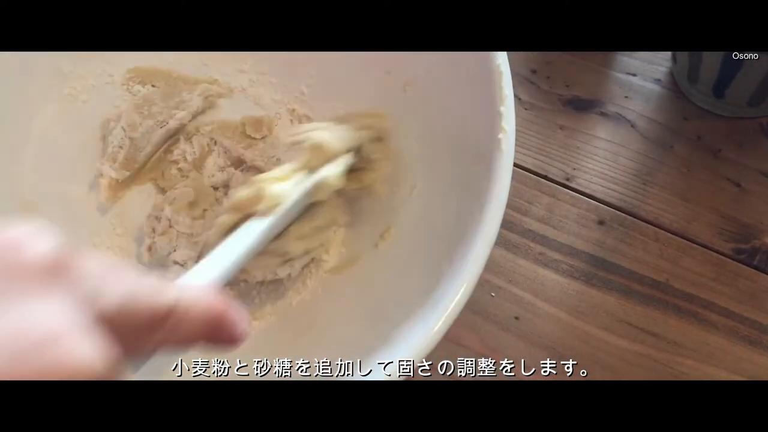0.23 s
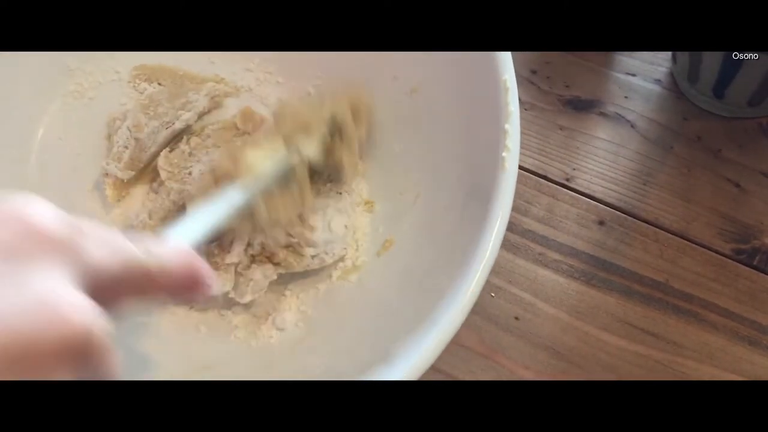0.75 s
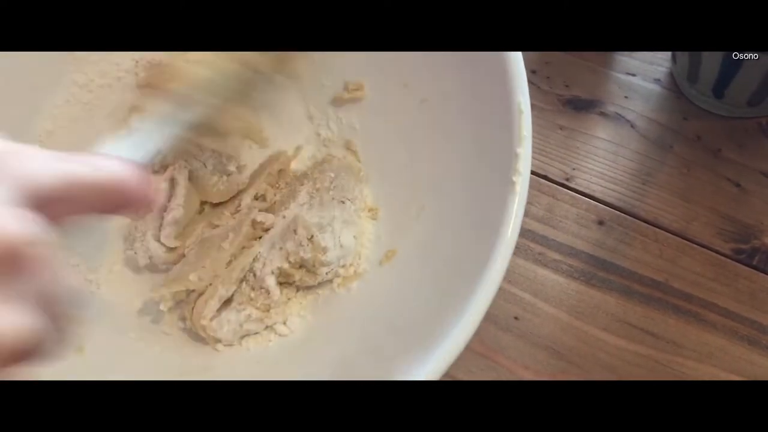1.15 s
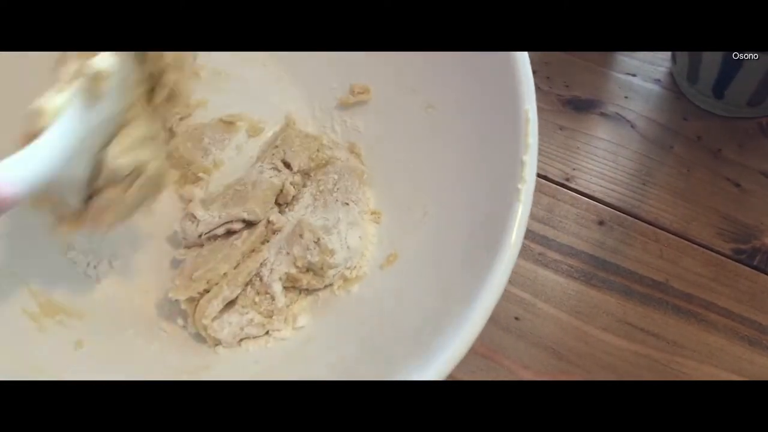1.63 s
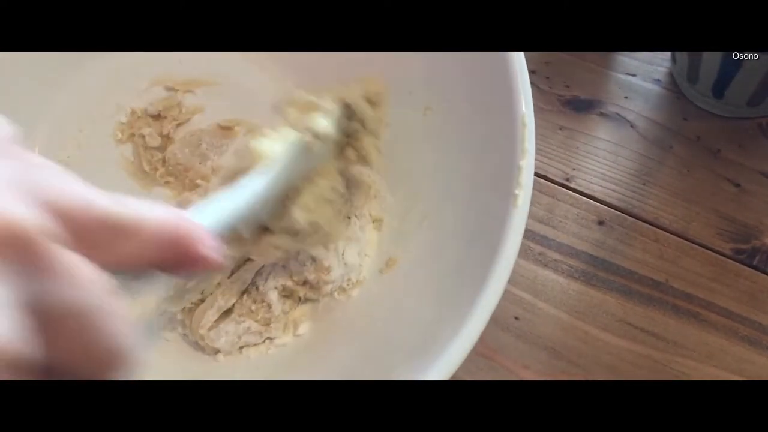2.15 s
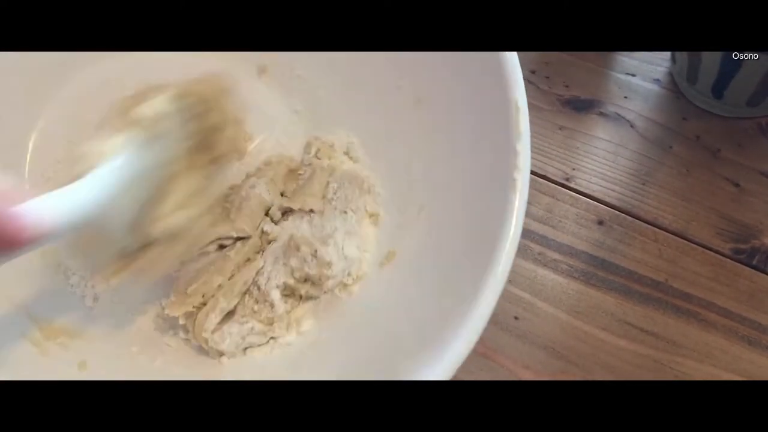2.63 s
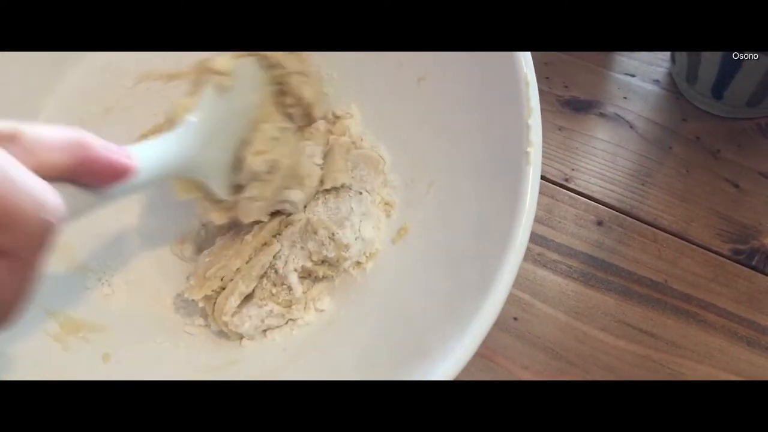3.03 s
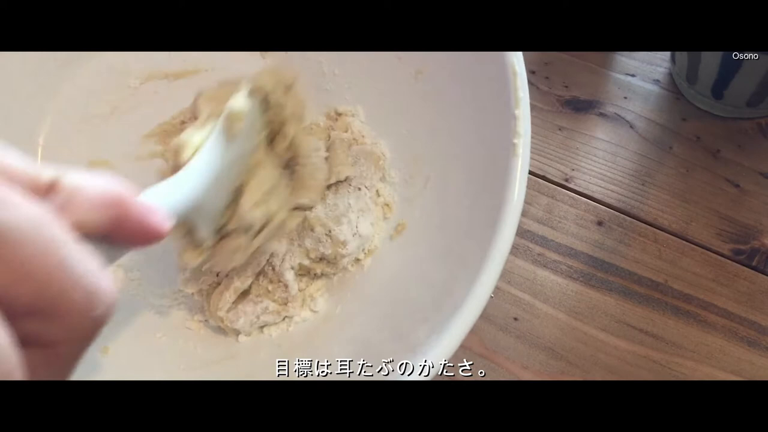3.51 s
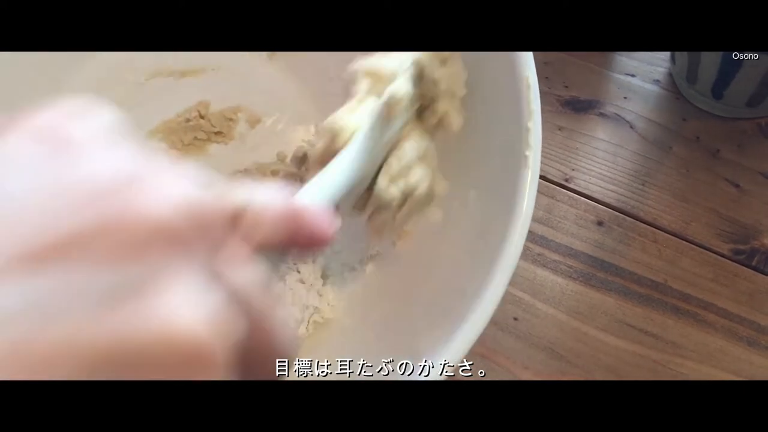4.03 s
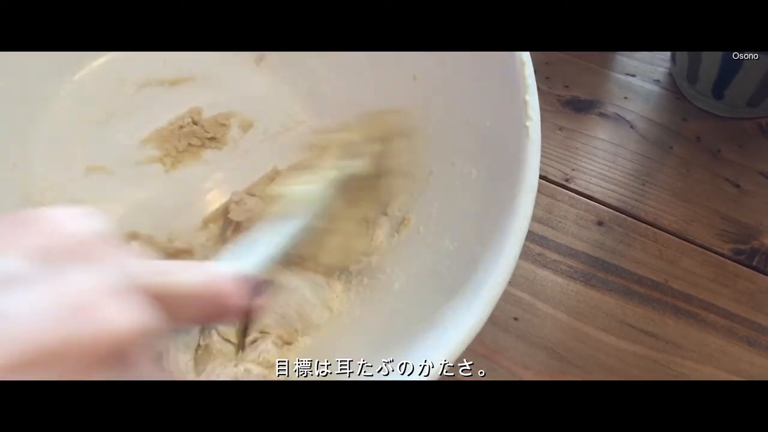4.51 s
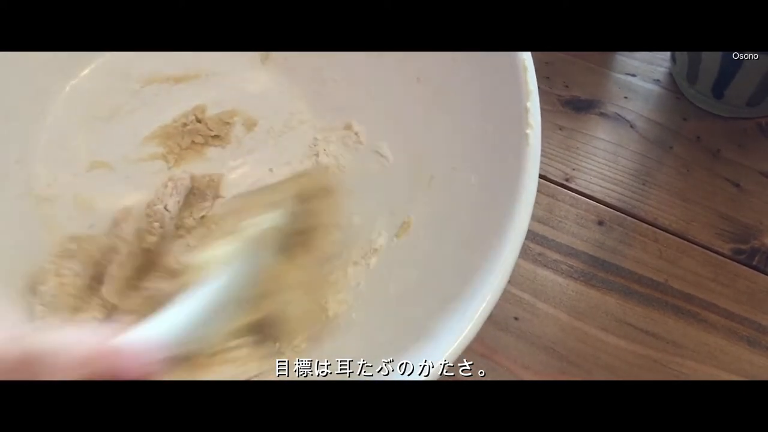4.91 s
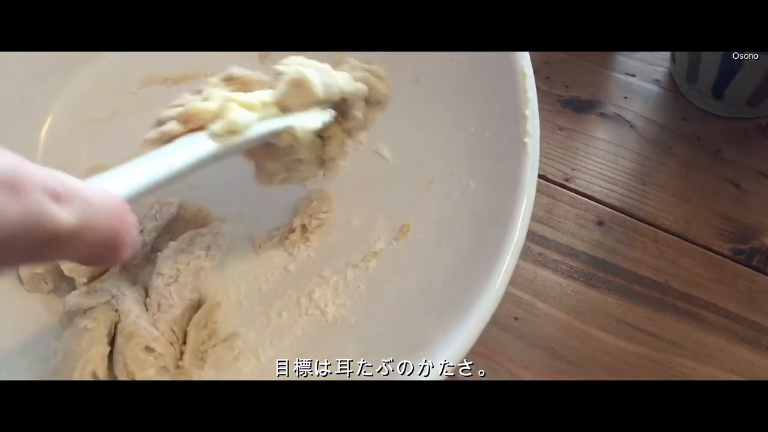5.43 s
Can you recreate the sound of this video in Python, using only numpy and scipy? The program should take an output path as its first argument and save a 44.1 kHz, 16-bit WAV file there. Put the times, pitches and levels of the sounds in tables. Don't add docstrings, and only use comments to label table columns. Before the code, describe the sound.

A spatula scrapes stiff, floury dough in a glazed bowl, with short gritty strokes, sticky snaps and dull knocks over a wooden table.

```python
import sys
import numpy as np
from scipy import signal
from scipy.fft import rfft, irfft, next_fast_len
from scipy.io import wavfile
from scipy.ndimage import uniform_filter1d, map_coordinates

SR = 44100
rng = np.random.default_rng(int(sys.argv[2]) if len(sys.argv) > 2 else 0)


def linear_from_db(decibels):
    return 10 ** (np.asarray(decibels, float) / 20)


def master(y):
    cut = np.clip(np.atleast_2d(y).T, -1, 1)
    pcm = np.round(cut * 32767)
    wavfile.write(sys.argv[1], SR, pcm.astype(np.int16))


N = 249606

# f/Hz, level/dB
ROOM_SPECTRUM = [(30, -18.5), (50, -1.5), (75, -3.5), (161, -9), (473, -20.5), (548, -22), (754, -22),
                 (2330, -25), (4190, -28.5), (4970, -24), (5490, -26.5), (8740, -33), (10400, -33),
                 (14600, -37), (15700, -54)]
# t/s, peak level/dB, f/Hz, rebound interval/s, loss per rebound/dB
ROCKS = [(0.017, -32.5, 81.2, 0.046, 4.5), (.138, -41.5, 64.6, 0.028, 6), (1.264, -40.5, 76.4, 0.022, 5),
         (1.553, -42.5, 67, 0.043, 6), (1.801, -51.5, 80.5, 0.031, 4), (1.965, -46.5, 66, 0.037, 1),
         (2.084, -41.5, 68, 0.03, 12), (2.265, -49.5, 75.5, .06, 9), (2.405, -31.5, 83, 0.043, 4.5),
         (2.593, -36.5, 65.6, 0.033, 15), (2.657, -53.5, 66, 0.039, 0), (2.848, -35, 100, 0.025, 7),
         (2.944, -47, 82, .036, 3.5), (3.337, -37.5, 65.5, 0.029, 8), (3.438, -35.5, 75, 0.025, 11),
         (3.509, -45, 64.7, 0.034, 22), (4.206, -36, 86.5, 0.054, 8.5), (4.703, -35, 79, 0.036, 5.5),
         (4.983, -46, 71.4, 0.048, 6.5)]
# t/s, peak level/dB, f/Hz, swell width/cycles
NUDGES = [(.829, -43.5, 77, 0.62), (.885, -56, 67, 0.83), (.951, -62, 88, 2.1), (1.091, -54.5, 57, 0.77),
          (1.131, -51.5, 77, 0.65), (1.187, -39, 77.4, 0.64), (1.21, -38, 80, 0.69),
          (1.362, -53.4, 66, .45), (1.442, -42, 90, 0.62), (1.518, -43, 66, 0.99), (1.724, -57, 69, 0.36),
          (1.904, -38, 66.3, 0.48), (2.224, -47, 53.4, 0.76), (2.566, -46.5, 74, 0.46),
          (2.753, -54, 73, 0.47), (2.807, -41, 61.4, 0.44), (3.302, -66, 112, .6),
          (3.403, -39.5, 72.6, 1.3), (3.598, -68, 77, .45), (3.719, -37.5, 62, 0.48),
          (3.779, -51, 74.8, 3.6), (3.824, -38.5, 76, 0.62), (4.545, -43, 71, 0.76), (4.603, -23, 91, 0.53),
          (4.643, -36.5, 98, 2.5), (4.906, -36.5, 80, 0.49), (4.944, -52, 93.6, 4.1),
          (5.238, -45, 80, 0.36), (5.319, -64, 92, 3.2), (5.49, -51, 85, 0.73)]
# start t/s, length/s, level/dB, initial f/Hz, final f/Hz
SLIDES = [(2.41, .08, -60, 455, 500), (2.49, .1, -60, 500, 600), (2.405, .06, -63, 700, 620),
          (2.39, 0.12, -65, 1040, 970), (2.55, .04, -65, 1150, 1100), (2.48, 0.084, -63, 1900, 1880),
          (2.868, .014, -51, 1800, 1790), (2.885, .045, -63, 1800, 1780), (2.94, 0.027, -61, 1900, 1850),
          (2.855, .025, -60, 1250, 1100), (2.838, .01, -52, 1250, 1250), (3.455, .025, -62, 2050, 2050),
          (3.48, .06, -66, 2000, 2000), (1.575, 0.033, -66, 1900, 1980), (1.543, .012, -62, 1030, 1030),
          (2.111, .012, -44, 1200, 1140), (4.935, 0.038, -66, 3280, 3500), (3.328, .04, -61, 1050, 1050),
          (1.855, .025, -63, 500, 480), (2.96, 0.096, -64, 520, 600), (.62, 0.048, -68, 8100, 8100),
          (3.325, 0.013, -60.5, 7700, 7800), (3.326, 0.013, -59, 2950, 2950), (3.505, .035, -54, 520, 680),
          (3.52, .03, -63, 1100, 1050), (4.58, .025, -68, 1300, 1300), (4.51, .07, -62, 470, 480),
          (4.6, .14, -47, 155, 150), (4.59, .1, -60, 260, 240), (1.17, .11, -66, 200, 180),
          (.96, .03, -66, 3500, 3550), (1.02, .045, -69, 4350, 4350), (1.02, .03, -67, 2550, 2550),
          (1.19, .04, -68, 2650, 2600), (1.21, .04, -68, 2000, 1950), (1.17, .09, -66, 600, 550),
          (5.01, .05, -64, 3300, 3600)]
# t/s, peak level/dB, f/Hz
SNAPS = [(0.0164, -69, 1350), (0.8589, -54, 2140), (1.856, -48, 1270), (1.8724, -56, 3100),
         (1.8843, -47, 1270), (1.8957, -47.5, 1180), (2.075, -49, 1660), (2.0865, -48, 1400),
         (2.097, -46, 1500), (2.11, -39, 3000), (2.1107, -30, 1800), (2.1121, -43, 1180),
         (2.4354, -54, 1900), (3.122, -54, 900), (3.3323, -71, 2060), (3.5665, -45, 2480),
         (3.5668, -53, 1500), (3.5662, -53, 3400), (4.5137, -51, 2950), (4.8905, -57, 1380),
         (4.913, -52, 1500), (5.22, -52.5, 1260), (5.2217, -45, 2300)]
# t/s, clack level/dB, wall ring level/dB, ring f/Hz, thud level/dB
KNOCKS = [(0.0114, -63, -86, 457, -43), (0.0616, -69, -83, 428, -47), (1.168, -67, -54.5, 513, -54),
          (1.5437, -54.5, -57, 452, -47), (1.79, -59.5, -64, 587, -49), (1.8555, -61, -53, 497, -68),
          (1.8715, -55, -55, 519, -66), (1.883, -53, -51.5, 522, -69), (1.895, -57, -52, 500, -70),
          (1.9428, -62, -73, 590, -46), (2.3826, -37, -44, 520, -45), (2.3838, -32, -27, 475, -25),
          (2.445, -33, -50, 496, -41), (2.547, -62, -51, 543, -60), (2.576, -58, -51, 507, -42.5),
          (2.8394, -50, -36, 427, -29), (2.8565, -43, -40, 487, -38), (2.8614, -41, -38, 483, -36),
          (2.867, -45, -44, 453, -39), (3.3145, -45, -37.5, 509, -34.5), (3.3295, -46.5, -51, 580, -58),
          (3.5236, -63, -54, 594, -76), (3.5379, -73, -37.5, 506, -81), (4.1736, -86, -57, 450, -48),
          (4.3305, -87, -56.5, 515, -73), (4.584, -59, -53, 483, -37.5), (4.632, -82, -80, 467, -50),
          (4.8899, -58, -55, 453, -55), (4.9119, -68, -57, 432, -67)]
# f/Hz, width/Hz
HOLLOWS = [(345, 30), (1480, 160)]
# f/Hz, width/Hz, level/dB
BLADE_MODES = [(1792, 39, -1.5), (1943, 100, 9.5), (2242, 144, 3.5), (2565, 130, -1.5), (2895, 80, -6),
               (3065, 110, -3.5), (3500, 260, -3.5), (4170, 200, -4.5)]
# f/Hz, width/Hz, level/dB
WALL_MODES = [(458, 12, -11), (529, 97, 8), (614, 41, -2), (1049, 75, -6), (1226, 42, -13)]
# f/Hz, width/Hz, level/dB
RIM_MODES = [(1038, 45, 2.5), (1215, 75, -1)]
# f/Hz, width/Hz, level/dB
TABLE_MODES = [(155, 44, 21), (202.4, 6.1, -3), (250, 17, 0), (287, 59, -25.5), (363, 19, -52)]
# f/Hz, width/Hz, level/dB
GLAZE_MODES = [(6540, 75, 4), (7035, 70, 4), (7320, 810, 14), (7940, 120, 1), (8550, 140, -10),
               (9800, 35, -25), (10940, 54, -4), (11300, 260, -17), (12000, 59, -40), (11850, 190, -7),
               (11800, 100, -21), (11900, 52, -20), (14500, 170, -8), (13800, 210, -40)]
# peak t/s, rise/s, grind level/dB, share of the thin edge/dB
PRESSES = [(.15, 0.17, -75.5, 0), (.55, 0.38, -74, -1.5), (.87, 0.16, -67.5, -1.5), (0.976, 0.059, -62, -1),
           (1.044, 0.078, -63, -3.5), (1.21, 0.089, -66.5, -3.5), (1.34, 0.07, -67, -1),
           (1.49, 0.054, -69, 1), (1.58, 0.085, -68.5, -11), (1.882, 0.06, -58, -5.5),
           (1.92, 0.056, -64, -1.5), (2.08, 0.042, -55, -3), (2.11, 0.066, -55.5, -4.5),
           (2.4, 0.039, -60, -31), (2.451, 0.02, -46, -9), (2.53, .12, -61.5, -5.5),
           (2.64, 0.056, -68.5, -4), (2.873, 0.026, -53, -12), (2.94, .12, -62.5, -28),
           (3.03, 0.1, -69.5, 0), (3.332, 0.03, -60, -4), (3.49, 0.16, -69.5, -10), (3.56, 0.058, -78, 1),
           (3.88, 0.2, -68.5, -2), (4.285, 0.11, -64.5, -1.5), (4.56, 0.078, -69, 2),
           (4.701, 0.084, -61, -1), (4.95, 0.038, -64.5, -2), (5.005, .055, -57, 0),
           (5.045, 0.06, -55, 0.5), (5.222, 0.016, -58.5, -10), (5.3, 0.16, -79, -3)]
# peak t/s, rise/s, wall hum level/dB, table drag level/dB
LEANS = [(0.0, 0.57, -94, -64), (.55, 1, -80.5, -72), (.98, 0.61, -79, -75.5), (1.27, 0.31, -69, -64.5),
         (1.55, 0.23, -72.5, -68), (1.95, 0.82, -79, -68.5), (2.43, 0.08, -57.5, -55),
         (2.52, 0.16, -63, -58.5), (2.65, 0.19, -91, -67.5), (2.93, 0.19, -64.5, -62.5),
         (3.03, 0.31, -67, -86), (3.34, 0.068, -63, -59), (3.48, 0.68, -73.5, -65), (4.26, 0.37, -76, -69),
         (4.545, 0.053, -65.5, -72), (4.63, 0.2, -74, -59), (4.72, 0.15, -76, -61),
         (4.96, 0.13, -68, -61.5), (5.07, 0.085, -87, -66), (5.45, 1, -85, -74)]
# f/Hz, level/dB
PASTE_SPECTRUM = [(410, -5), (700, 2.5), (930, -17), (1140, 3.5), (2710, -19.5), (4920, -13), (5500, -9.5),
                  (7150, -44), (12100, -120)]
# peak t/s, rise/s, hiss level/dB, airy part relative to hiss/dB
SWEEPS = [(0.0, 0.049, -73.5, -8), (.17, 0.058, -73.5, -7), (.56, 0.07, -74, -5), (0.644, 0.031, -64, -4),
          (.84, 0.1, -72.5, -6), (.97, .045, -63, -8), (1.048, 0.049, -65.5, -10), (1.24, 0.14, -78, 2),
          (1.331, 0.047, -67, -0.5), (1.501, 0.064, -75, -2), (1.851, 0.028, -59, -13),
          (1.911, 0.044, -51, -14.5), (1.979, 0.05, -62, -9), (2.096, 0.067, -53, -7),
          (2.5, 0.074, -68, -7), (2.598, 0.064, -63.5, -19), (2.89, 0.086, -71, -7),
          (3.02, 0.088, -72.5, -6), (3.17, 0.035, -75, -14), (3.504, 0.05, -65, 0.5),
          (3.811, 0.053, -66, 3.5), (3.865, 0.066, -60, -5), (3.955, 0.052, -62.5, -2.5),
          (4.176, 0.037, -60, -7), (4.304, 0.063, -62, -3.5), (4.561, 0.051, -68.5, -4),
          (4.716, 0.073, -59, -6), (5.021, 0.092, -51.5, -3.5), (5.22, 0.067, -70, -3),
          (5.31, .11, -77, -2)]
# t/s, peak level/dB, decay time t60/s
SCUFFS = [
    (1.1707, -36.5, 0.1),
    (1.57, -38, 0.1),
    (1.7896, -33, 0.047),
    (2.441, -33, 0.048),
    (2.8654, -36, 0.031),
    (3.326, -41, 0.052),
    (3.3836, -35.5, 0.074),
    (4.148, -40, 0.18),
    (4.5131, -47, 0.18),
]
# f/Hz, level/dB
FLOUR_SPECTRUM = [(2650, -9), (4500, -3), (5000, -16), (5940, -18), (6330, -22.5), (8710, 4), (10600, -0.5),
                  (11500, -0.5), (15700, 0)]
# f/Hz, width/Hz, depth/dB
PORT_DIPS = [(5030, 590, -4.5), (10450, 300, -3)]


def unit(x):
    return x / np.sqrt(np.mean(x ** 2) + 1e-20)


def wobble(rate):
    s = np.arange(0, N / SR + .002, .001)
    knots = rng.standard_normal(int(N * rate / SR) + 4)
    return np.interp(np.arange(N) / SR, s, map_coordinates(knots, [s * rate]))


def filtered(x, response):
    m = next_fast_len(N + 8192)
    return irfft(rfft(x, m) * response(np.fft.rfftfreq(m, 1 / SR)), m)[:N]


def highpassed(x, corner_hz):
    return filtered(x, lambda hz: 1 / (1 + (corner_hz / (hz + 1)) ** 8))


def coloured(x, spectrum):
    f, level = np.transpose(spectrum)
    return unit(filtered(x, lambda hz: linear_from_db(np.interp(np.log(hz + 1), np.log(f), level, -120, -120))))


def grit(spread_db, clump_db):
    size = linear_from_db(spread_db * rng.standard_normal(N) + clump_db * wobble(70))
    return unit(size * rng.standard_normal(N))


def rubbed(force, modes):
    out = np.zeros(N)
    for hz, width, db in modes:
        ring = signal.lfilter(*signal.iirpeak(hz, hz / width, SR), force)
        out += linear_from_db(db + 2.4 * wobble(22)) * unit(ring)
    return unit(out)


def struck(modes, damping, attack):
    t = np.arange(SR // 5) / SR
    hz, width, db = np.transpose(modes)[:, :, None]
    strength = linear_from_db(db + 1.5 * rng.standard_normal(hz.shape))
    decay = np.exp(-np.pi * damping * width * t)
    ring = np.sum(strength * decay * np.sin(2 * np.pi * hz * t), axis=0)
    ring = ring * (1 - np.exp(-t / attack)) ** 1.36
    return ring / np.abs(ring).max()


def packets(rows):
    out = np.zeros(N)
    for s, db, hz, cycles in rows:
        at = np.arange(max(round((s - 5 / hz) * SR), 0), min(round((s + 5 / hz) * SR), N))
        turns = (at / SR - s) * hz
        out[at] -= linear_from_db(db) * np.exp(-.5 * (turns / cycles) ** 2) * np.cos(2 * np.pi * turns)
    return out


def strokes(rows, hold):
    peak, rise = np.transpose(rows)[:2, :, None]
    s = np.arange(0, N / SR + .002, .001)
    fall_over_rise, drop_db, curve = 1.05, 24, 1.75
    away = np.where(s < peak, peak - s, (s - peak) / fall_over_rise) / rise
    shape = linear_from_db(-np.minimum(drop_db * np.maximum(away - hold, 0) ** curve, 200))
    return lambda gains: np.interp(np.arange(N) / SR, s, np.sqrt(gains ** 2 @ shape ** 2))


def patchy(x, patchy_db):
    z = signal.stft(x, nperseg=512)[2]
    field = uniform_filter1d(rng.standard_normal(z.shape), size=3, axis=0)
    field = uniform_filter1d(field, size=9, axis=1)
    return unit(signal.istft(z * linear_from_db(patchy_db * unit(field)), nperseg=512)[1][:N])


def kitchen():
    return linear_from_db(-67.5 + 0.087 * wobble(16.0)) * coloured(rng.standard_normal(N), ROOM_SPECTRUM)


def thumps():
    fill = 0.26
    rebounds = [(s + k * gap, db - k * loss_db, hz, fill * gap * hz)
                for s, db, hz, gap, loss_db in ROCKS for k in range(4)]
    return packets(NUDGES + rebounds)


def slides():
    out = np.zeros(N + SR)
    unsteadiness, steady = .12, .4
    for s, length, db, from_hz, to_hz in SLIDES:
        u = np.linspace(0, 1, round(length * SR) + 2)
        turns = np.cumsum(from_hz + (to_hz - from_hz) * u) / SR
        a, b = [map_coordinates(k, [unsteadiness * turns]) for k in rng.standard_normal((2, 200))]
        tone = (a + steady) * np.cos(2 * np.pi * turns) + b * np.sin(2 * np.pi * turns)
        out[round(s * SR):][:len(u)] += linear_from_db(db) * np.sin(np.pi * u) ** 0.5 * tone
    return out[:N]


def snaps():
    return packets([(s + 0.00092, db, hz, .7) for s, db, hz in SNAPS])


def knocks():
    out = np.zeros(N + SR)
    blade = [(hz, w, db - 3.5 * np.log2(hz / 1800)) for hz, w, db in BLADE_MODES]
    for s, clack_db, ring_db, ring_hz, thud_db in KNOCKS:
        clack = linear_from_db(clack_db) * struck(blade, damping=1.48, attack=0.00072)
        free_db = np.clip((ring_db - clack_db) / 2 - 18, -24, 0)
        wall = [(ring_hz, 13, free_db), (ring_hz, 100, 3), (1.25 * ring_hz, 130, 1), (1.55 * ring_hz, 190, 0.3)]
        ring = linear_from_db(ring_db) * struck(wall, damping=0.88, attack=0.0012)
        rim_db = -25 + 0.69 * (clack_db + ring_db) / 2
        rim = linear_from_db(rim_db) * struck(RIM_MODES, damping=0.53, attack=0.00042)
        thud = linear_from_db(thud_db) * struck(TABLE_MODES, damping=1.64, attack=0.0019)
        out[round(s * SR):][:len(clack)] += clack + ring + rim + thud
    for hz, width in HOLLOWS:
        out = signal.lfilter(*signal.iirnotch(hz, hz / width, SR), out)
    return out[:N]


def leaning():
    spread = strokes(LEANS, hold=0.025)
    wall_db, drag_db = np.transpose(LEANS)[2:]
    wall = spread(linear_from_db(wall_db)) * rubbed(grit(spread_db=2.5, clump_db=2.5), WALL_MODES)
    drag_level = spread(linear_from_db(drag_db)) + linear_from_db(-80)
    return wall + drag_level * rubbed(grit(spread_db=2.5, clump_db=2.5), TABLE_MODES)


def dough():
    spread = strokes(PRESSES, hold=.05)
    grind_db, edge_db = np.transpose(PRESSES)[2:]
    edge = np.clip(linear_from_db(edge_db), .05, .97)
    coarse = grit(spread_db=6.5, clump_db=2.7)
    paste = coloured(coarse, PASTE_SPECTRUM)
    crisp = highpassed(paste, 2350)
    low = unit(linear_from_db(-4) * unit(paste - crisp) + rubbed(coarse, BLADE_MODES[:3]))
    high = unit(linear_from_db(-1.0) * unit(crisp) + rubbed(coarse, BLADE_MODES[3:]))
    low_level = spread(linear_from_db(grind_db) * np.sqrt(1 - edge ** 2))
    high_level = spread(linear_from_db(grind_db) * edge) + linear_from_db(-105)
    return low_level * patchy(low, patchy_db=3.5) + high_level * patchy(high, patchy_db=3.5)


def flour():
    spread = strokes(SWEEPS, hold=.12)
    hiss_db, air_db = np.transpose(SWEEPS)[2:]
    rest_db = -90.5
    level = spread(linear_from_db(hiss_db)) + linear_from_db(rest_db)
    airy = spread(linear_from_db(hiss_db + air_db)) + linear_from_db(rest_db + 3.0)
    t = np.arange(SR // 4) / SR
    for s, db, t60 in SCUFFS:
        landing = linear_from_db(db - 21 - 60 * t / t60) * (1 - np.exp(-t / 0.0024))
        level[round(s * SR):][:len(t)] += landing
        airy[round(s * SR):][:len(t)] += linear_from_db(-25) * landing
    fine = grit(spread_db=4, clump_db=2.0)
    hiss = unit(coloured(fine, FLOUR_SPECTRUM) + linear_from_db(-1) * rubbed(fine, GLAZE_MODES))
    hiss = patchy(hiss, patchy_db=3.5)
    air = highpassed(hiss, 10000)
    return level * unit(hiss - air) + airy * unit(air)


def scene():
    table = thumps() + leaning()
    blade = slides() + snaps() + knocks()
    return (kitchen() + table + blade + dough() + flour())[None]


def roll_off(x):
    return signal.sosfilt(signal.butter(12, 15890, fs=SR, output="sos"), x)


def record(dry):
    def port(f):
        dips_db = sum(db * np.exp(-((f - hz) / w) ** 2) for hz, w, db in PORT_DIPS)
        return (f < 15890) * linear_from_db(dips_db)
    mix = filtered(dry[0], port)[None]
    return roll_off(mix)


dry = scene()
out = record(dry)
master(out)
```